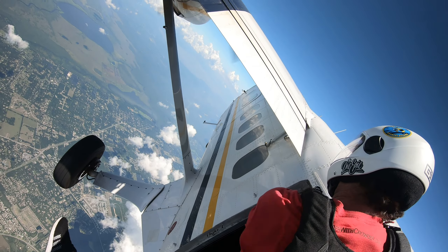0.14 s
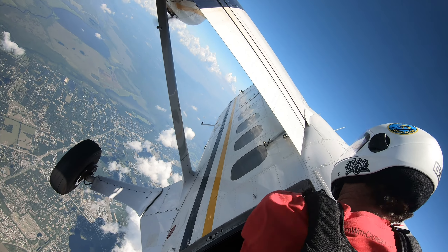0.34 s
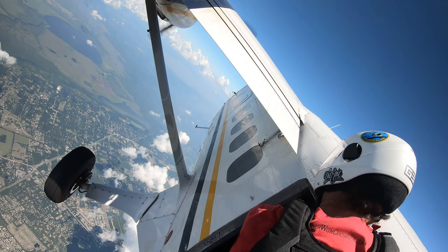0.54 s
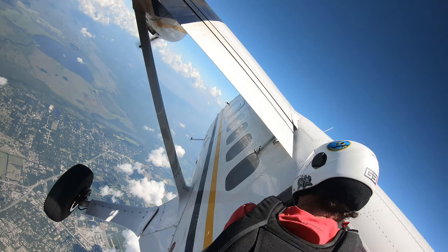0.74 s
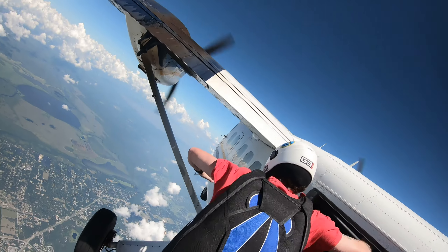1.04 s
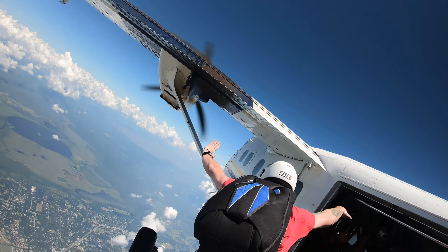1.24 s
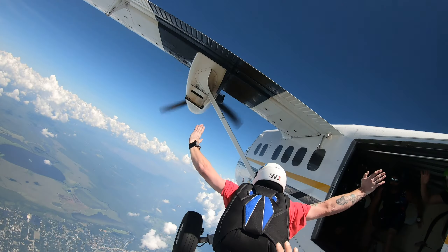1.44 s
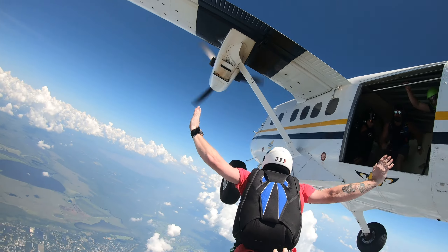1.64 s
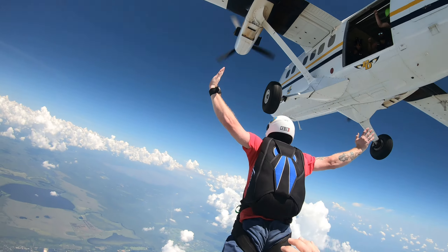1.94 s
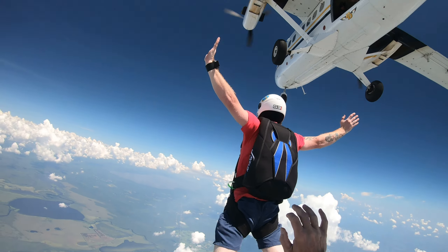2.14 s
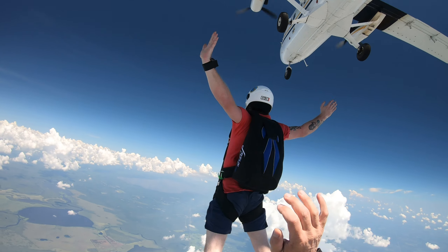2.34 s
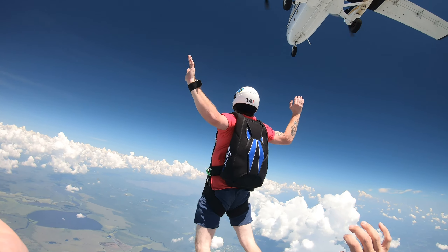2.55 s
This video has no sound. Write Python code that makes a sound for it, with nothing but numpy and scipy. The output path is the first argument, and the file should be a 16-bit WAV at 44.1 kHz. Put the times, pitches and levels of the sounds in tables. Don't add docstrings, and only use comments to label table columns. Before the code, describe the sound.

Loud wind roars and buffets a helmet camera microphone as a skydiver drops from a propeller aircraft

```python
import sys
import numpy as np
from scipy import signal
from scipy.fft import rfft, irfft
from scipy.io import wavfile
from scipy.ndimage import uniform_filter1d, minimum_filter1d

SR = 44100
rng = np.random.default_rng(int(sys.argv[2]) if len(sys.argv) > 2 else 0)


def persist_wave(psi):
    counts = np.round(np.clip(psi, -1, 1) * 32767).astype(np.int16)
    wavfile.write(sys.argv[1], SR, np.atleast_2d(counts).T)


def boost_factor(decibels):
    exponent = np.asarray(decibels, float) / 20
    return 10 ** exponent


N = 118629
TIME_S = np.arange(N) / SR

# t/s, propeller wash level/dB, turbine hiss level/dB
NEARNESS = [(0.0, -17, -37.5), (0.03, -9, -43.5), (0.23, -12.5, -43), (0.4, -13.5, -43.5),
            (0.53, -15.5, -44.5), (0.61, -5.5, -47), (0.65, -12, -48.5), (0.79, -12, -47),
            (1.15, -13.5, -54), (1.37, -19, -55.5), (1.39, -12.5, -68), (1.57, -20, -59),
            (1.74, -19.5, -54.5), (2.69, -13, -61)]
# f/Hz, level/dB per Hz
ROAR_SPECTRUM = [(120, -33.5), (280, 2), (500, -7.5), (1000, -17), (2400, -28), (4000, -46), (7000, -73.5),
                 (10200, -92)]
# f/Hz, level/dB per Hz
SHARP_SPECTRUM = [(1500, -32), (3000, 8), (4500, -1.5), (6000, -17.5), (8000, -39.5)]
# f/Hz, level/dB per Hz
FIZZ_SPECTRUM = [(3500, -22.5), (6000, 4.5), (8000, -7.5), (10000, -12), (11500, -32.5), (15500, -36)]
EDDY_RISE_S, SNAP_RISE_S = 0.00063, 0.00018


def evened(x):
    return x / np.sqrt(np.mean(x ** 2) + 1e-20)


def along(table, order):
    rows = np.array(table)
    return np.interp(TIME_S, rows[:, 0], rows[:, order])


def coloured(points):
    f, level_db = np.transpose(points)
    hz = np.fft.rfftfreq(N, 1 / SR)
    slope_db = np.interp(np.log(hz + 1), np.log(f + 1), level_db)
    slope_db -= 60 * np.log2(np.maximum(hz / f[-1], 1))
    return evened(irfft(rfft(rng.standard_normal(N)) * boost_factor(slope_db), N))


def firm(points):
    x = coloured(points)
    power = uniform_filter1d(uniform_filter1d(x ** 2, size=90), size=90)
    return evened(x / np.sqrt(power))


def drift(hz):
    f = np.fft.rfftfreq(N, 1 / SR)
    weight = (f > 0.3 * hz) / np.sqrt(1 + (f / hz) ** 4)
    return evened(irfft(rfft(rng.standard_normal(N)) * weight, N))


def patchy(x, patchy_db, size):
    z = signal.stft(x, nperseg=256, noverlap=192)[2]
    across_bands = uniform_filter1d(rng.standard_normal(z.shape), 6, 0)
    field = evened(uniform_filter1d(across_bands, size, 1))
    return evened(signal.istft(z * boost_factor(patchy_db * field), nperseg=256, noverlap=192)[1][:N])


def bursts(times, levels_db, rise_s, fall_s):
    clicks, t = np.zeros(N), np.arange(2000) / SR
    clicks[np.clip((np.array(times) * SR).astype(int), 0, N - 1)] = boost_factor(np.array(levels_db))
    shape = (1 - np.exp(-2 * t / rise_s)) ** 2 * np.exp(-t / fall_s)
    return signal.oaconvolve(clicks, shape / shape.max())[:N]


def fuzzy(hz, width_hz, fuzz):
    wobble = 1 - fuzz + fuzz * (drift(width_hz) + 1j * drift(width_hz))
    carrier = np.exp(2j * np.pi * np.cumsum(hz) / SR)
    return evened((wobble * carrier).real)


def lulls():
    # middle t/s, half length t/s, level/dB
    gaps = [(0.575, 0.0035, -4), (0.755, 0.0069, -4), (1.059, 0.0071, -3), (1.102, 0.012, -2.5),
            (1.177, 0.0027, -4), (1.218, 0.015, -7), (1.299, 0.015, -5), (1.75, 0.011, -8),
            (1.848, .008, -2), (2.011, 0.013, -3.5), (2.065, 0.004, 0), (2.253, 0.0068, -6.5),
            (2.295, 0.0045, -4.5), (2.397, 0.0051, -6.5), (2.592, 0.017, -5.5), (0.553, 0.0043, 4),
            (0.753, 0.0045, 5), (1.108, 0.0096, 5), (1.166, 0.0083, 5), (1.259, .009, 2.5),
            (2.378, .015, 4.5), (0.866, 0.011, 2.5)]
    return boost_factor(sum(db * np.exp(-((TIME_S - s) / half) ** 2) for s, half, db in gaps))


def whines():
    # middle t/s, half length t/s, f/Hz, width f/Hz, level/dB
    tones = [
        (0.889, 0.12, 5620, 89.3, -71),
        (1.271, 0.048, 2200, 60, -45),
        (1.246, 0.035, 3143, 70, -46),
        (1.538, 0.064, 2370, 200, -39.5),
        (1.714, 0.14, 3323, 260, -47),
        (1.9, 0.29, 7680, 119, -82.5),
    ]
    out = np.zeros(N)
    for middle_s, half_s, hz, width_hz, db in tones:
        swell = np.exp(-((TIME_S - middle_s) / half_s) ** 4)
        out += fuzzy(hz + 0 * TIME_S, width_hz, 1.0) * boost_factor(db) * swell
    return out


def exhaust(gusts):
    shadow_s, fall_s = 0.8, 0.03
    shadow = 1 + np.exp(np.clip((TIME_S - shadow_s) / fall_s, -30, 30))
    return coloured(FIZZ_SPECTRUM) * boost_factor(-57 + 0.82 * gusts) / shadow


def turbine_hiss(gusts):
    # f/Hz, level/dB per Hz
    hiss_spectrum = [(800, -24), (2000, 4.5), (3300, 5), (4500, -2.5), (6000, -11.5), (9500, -31),
                     (11000, -48.5), (15500, -49)]
    flicker = boost_factor(1.2 * gusts + 0.8 * drift(57))
    hiss = evened(patchy(coloured(hiss_spectrum), patchy_db=2.1, size=4) * flicker)
    return lulls() * hiss * boost_factor(7 + along(NEARNESS, order=2))


def propeller_wash(gusts):
    # f/Hz, level/dB per Hz
    wash_spectrum = [(40, -15), (90, -13.5), (130, 0.5), (220, 0.5), (320, -12), (500, -34.5), (1500, -67)]
    return coloured(wash_spectrum) * boost_factor(-2.5 + along(NEARNESS, order=1) + 1.8 * gusts)


def blade_hum():
    # t/s, f/Hz, level/dB
    blades = [(0, 138.7, -12), (.1, 129.9, -21), (.38, 123.9, -14.5), (.5, 121.1, -22), (.82, 113.2, -22),
              (.9, 108, -14.5), (1.0, 96.57, -18.5), (1.35, 103.7, -23.5), (1.7, 100.5, -22.5),
              (2, 99.77, -57.5), (2.4, 112.2, -42), (2.5, 109.9, -15.5), (2.57, 121.3, -22),
              (2.69, 109.6, -24)]
    width_hz, fuzz, overtone = 9, 0.25, 1.62
    hz = along(blades, order=1)
    hum = fuzzy(hz, width_hz, fuzz) + boost_factor(-4) * fuzzy(overtone * hz, width_hz, fuzz)
    return hum * boost_factor(along(blades, order=2))


def aircraft(gusts):
    return blade_hum() + propeller_wash(gusts) + turbine_hiss(gusts) + whines() + exhaust(gusts)


def crackle(gusts):
    # f/Hz, level/dB per Hz
    crackle_spectrum = [(400, -21), (750, 5.5), (1400, 0.5), (2200, -20), (3200, -40.5)]
    from_s, rise_s = 2.265, 0.11
    onset = 1 / (1 + np.exp(-(TIME_S - from_s) / rise_s))
    return coloured(crackle_spectrum) * boost_factor(-30 + 3 * gusts) * onset * lulls()


def prickle():
    # t/s, peak level/dB
    pricks = [(0.1238, -26), (0.311, -27), (0.331, -22), (0.4541, -29), (0.4883, -24), (0.5174, -34),
              (0.5379, -38), (0.5518, -32), (0.5868, -36), (0.5887, -26), (0.6102, -19), (0.6212, -27),
              (0.6473, -27), (0.659, -27), (0.6902, -27), (0.7033, -23), (0.7315, -28), (0.7702, -32),
              (0.8227, -25), (0.8427, -26), (0.8583, -20.5), (0.8843, -33), (0.918, -32), (0.935, -19)]
    s, db = np.transpose(pricks)
    return firm(SHARP_SPECTRUM) * bursts(s, db - 7, SNAP_RISE_S, fall_s=0.0017)


def flutter():
    # t/s, peak level/dB
    taps = [(0.217, -33), (0.4873, -18.5), (0.8044, -17), (0.841, -21), (0.9175, -24), (1.051, -24),
            (1.2415, -26), (1.342, -31.5), (1.4641, -19.5), (1.607, -21), (1.6645, -18), (1.6803, -21),
            (1.7444, -26), (1.7865, -20), (1.7999, -22), (1.8274, -20), (1.8812, -18.5), (1.8911, -24.5),
            (1.9056, -17.5), (1.9264, -17.5), (1.9515, -20), (1.966, -18), (1.9824, -19.5), (2.055, -19.5),
            (2.0888, -23), (2.1196, -15.5), (2.1455, -22.5), (2.1914, -17), (2.2402, -28), (2.3174, -28.5),
            (2.358, -16.5), (2.3878, -17), (2.4274, -19), (2.4885, -16), (2.5084, -22), (2.5434, -33),
            (2.674, -22)]
    # f/Hz, level/dB per Hz
    flap_spectrum = [(500, -35.5), (1000, 5.5), (1800, -0.5), (2900, -7), (3600, -29), (6000, -56)]
    s, db = np.transpose(taps)
    return firm(flap_spectrum) * bursts(s, db - 6.5, EDDY_RISE_S, fall_s=0.0036)


def slaps():
    # t/s, peak level/dB
    strikes = [(0.12, -18), (0.197, -17), (0.645, -34), (1.124, -15), (1.252, -4), (1.305, -8),
               (1.328, -16), (1.476, -5), (1.533, -10.5), (2.153, -11.5), (2.192, -35), (2.232, -3),
               (2.302, -1), (2.446, -19.5), (2.477, -3), (2.524, -11.5), (2.578, -1.5)]
    # f/Hz, level/dB per Hz
    slap_spectrum = [(150, -28.5), (400, 11.5), (800, -12), (1800, -19.5), (3000, -30), (6000, -57.5)]
    s, db = np.transpose(strikes)
    return firm(slap_spectrum) * bursts(s, db - 9, EDDY_RISE_S, fall_s=0.0085)


def snaps():
    # t/s, peak level/dB, brightness level/dB
    pulses = [(0.0513, -59, -26), (0.0852, -40.5, -20), (0.1257, -27, -29), (0.1422, -29.5, -11.5),
              (0.457, -28, -13.5), (0.536, -30.5, -13.5), (0.6198, -31.5, -27), (0.658, -28.5, -24),
              (0.7024, -29.5, -15.5), (0.7305, -25.5, -18.5), (0.7725, -29.5, -14.5), (0.9377, -30.5, -27),
              (0.9538, -29, -24.5), (1.019, -33, -31.5), (1.072, -39, -11.5), (1.1063, -29, -30),
              (1.1484, -35.5, -15.5), (1.1826, -35, -22), (1.2534, -36, -16), (1.298, -35.5, -16.5),
              (1.3828, -36, -19.5), (1.4333, -38.5, -18), (1.5229, -32, -39), (1.642, -28.5, -24),
              (1.7057, -33.5, -38.5), (2.2865, -28, -35), (2.368, -28.5, -35), (2.4588, -40, -33.5),
              (2.602, -39, -18), (2.344, -39, -25), (2.413, -45, -23), (1.2, -31.5, -18), (1.121, -40, -16),
              (0.559, -32, -22), (0.593, -27.5, -25), (2.677, -41, -13), (2.626, -30.5, -30)]
    fall_s = 0.003
    s, db, bright_db = np.transpose(pulses)
    db = db - 1.5
    body = firm(SHARP_SPECTRUM) * bursts(s, db, SNAP_RISE_S, fall_s)
    return body + coloured(FIZZ_SPECTRUM) * bursts(s, db + bright_db, SNAP_RISE_S, fall_s)


def eddies():
    # t/s, peak level/dB, brightness level/dB
    vortices = [(0.089, -19, 18), (0.261, -10, -28), (0.308, -14.5, -17), (0.45, -30, -6),
                (0.552, -18, -22), (0.657, -22, -25), (0.701, -19.5, -11), (0.746, -11.5, -14),
                (0.897, -37, -9), (1.075, -12, -19), (1.105, -15, -13), (1.15, -20.5, -24),
                (1.388, -24, -19), (1.414, -11.5, -36.5), (1.44, -13.5, -45), (1.509, -13.5, -29),
                (1.549, -9.5, -34), (1.636, -13, -10), (1.772, -18.5, -18), (2.011, -11.5, -41),
                (2.043, -9.5, -32), (2.077, -14, -56), (2.158, -12, -17), (2.211, -7.5, -21),
                (2.268, -12, -20), (2.337, -9.5, -24), (2.415, -8, -32), (2.569, -9.5, -25),
                (2.628, -5.5, -24), (2.648, -19.5, -26)]
    # f/Hz, level/dB per Hz
    eddy_spectrum = [(250, -34), (600, 3.5), (1200, -5.5), (2500, -13.5), (3500, -30.5), (6000, -70.5)]
    fall_s = 0.0043
    s, db, bright_db = np.transpose(vortices)
    db = db - 7
    body = firm(eddy_spectrum) * bursts(s, db, EDDY_RISE_S, fall_s)
    return body + firm(SHARP_SPECTRUM) * bursts(s, db + bright_db - 20.5, EDDY_RISE_S, fall_s)


def ticks():
    per_s, spread_db, tick_s = 220, 2, 0.00097
    at = rng.random(N) < per_s / SR
    size = at * boost_factor(spread_db * np.minimum(rng.exponential(1, N), 4))
    t = np.arange(400) / SR
    gate = signal.oaconvolve(size, t / tick_s * np.exp(-t / tick_s))[:N]
    return evened(gate * coloured(ROAR_SPECTRUM[1:]))


def air(gusts):
    # t/s, rumble level/dB, roar level/dB
    stream = [(0.0, -25, -17), (0.28, -20, -19.5), (0.55, -19, -19), (0.61, -37, -21), (0.65, -19, -22),
              (0.87, -23, -21.5), (0.94, -17.5, -22.5), (1.1, -21.5, -26), (1.11, -18.5, -16.5),
              (1.24, -25, -21), (1.26, -13, -18.5), (1.27, -16, -22.5), (1.3, -19, -21.5),
              (1.83, -17.5, -25), (2.02, -20, -23.5), (2.07, -15.5, -21.5), (2.49, -20, -16),
              (2.69, -13.5, -17.5)]
    # f/Hz, level/dB per Hz
    rumble_spectrum = [(12, -31.5), (22, -10.5), (55, 3), (95, 1.5), (150, -8), (300, -30), (1000, -74.5)]
    rumble = coloured(rumble_spectrum) * boost_factor(1.5 + along(stream, order=1))
    tumble_s, span_s = 1.35, 0.38
    depth_db = 2.3 + 2.1 * np.exp(-((TIME_S - tumble_s) / span_s) ** 2)
    roar = evened(patchy(coloured(ROAR_SPECTRUM), patchy_db=2.0, size=5) * boost_factor(depth_db * gusts))
    roar += boost_factor(-7.5) * ticks()
    return rumble + lulls() * roar * boost_factor(0.5 + along(stream, order=2))


def scene():
    gusts = evened(0.6 * drift(60) + drift(180))
    background = aircraft(gusts) + crackle(gusts)
    impacts = prickle() + flutter() + slaps() + snaps() + eddies()
    return (background + impacts + air(gusts))[None]


def top_cut(x):
    return signal.sosfilt(signal.butter(12, 15650, fs=SR, output="sos"), x)


def record(dry):
    limit, edge_hz, fall_db_per_khz, fade_s = 0.89, 10500, 5, 0.0012
    over = np.maximum(-minimum_filter1d(-abs(dry), 301, axis=1) / limit / 0.82, 1)
    soft = dry / uniform_filter1d(uniform_filter1d(over ** 0.61, 151, axis=1), 151, axis=1)
    soft = soft * np.sin(np.pi / 2 * np.minimum(TIME_S / fade_s, 1)) ** 2
    top_khz = np.maximum(np.fft.rfftfreq(2 * N, 1 / SR) - edge_hz, 0) / 1000
    loss_db = np.minimum(fall_db_per_khz * top_khz, 9)
    dull = irfft(rfft(soft, 2 * N) * boost_factor(-loss_db), 2 * N)[:, :N]
    return top_cut(dull)


dry = scene()
out = record(dry)
persist_wave(out)
```